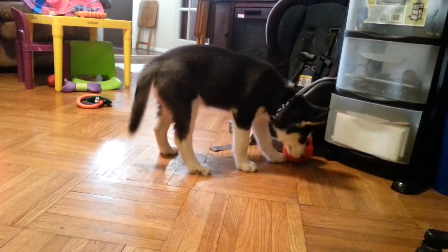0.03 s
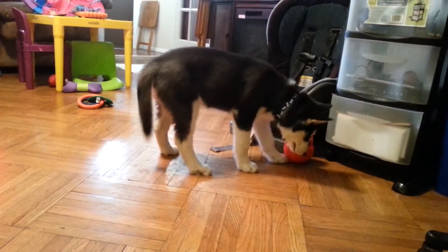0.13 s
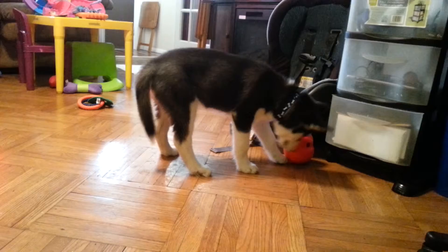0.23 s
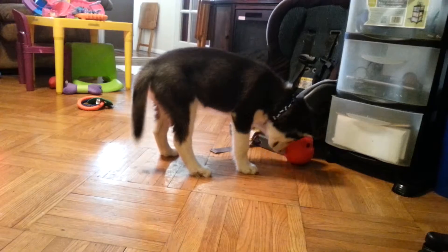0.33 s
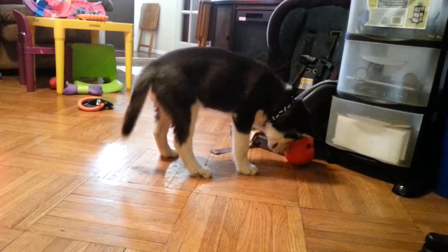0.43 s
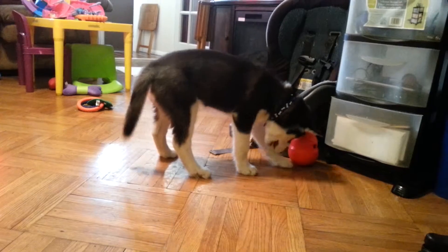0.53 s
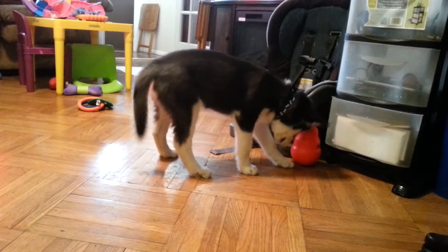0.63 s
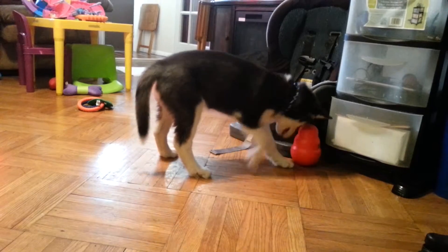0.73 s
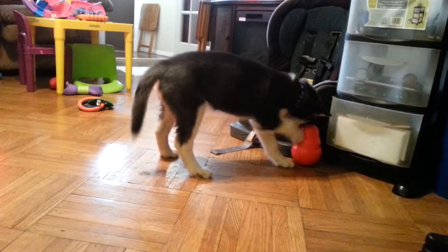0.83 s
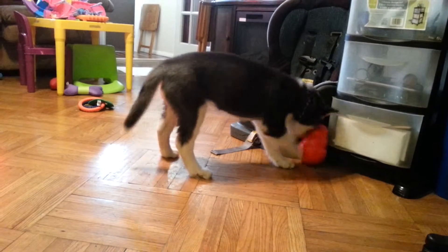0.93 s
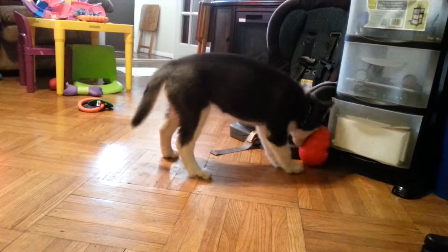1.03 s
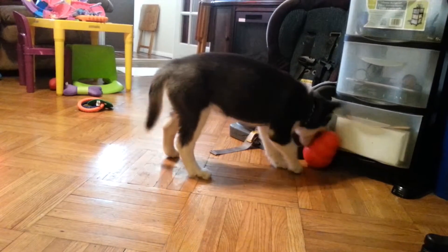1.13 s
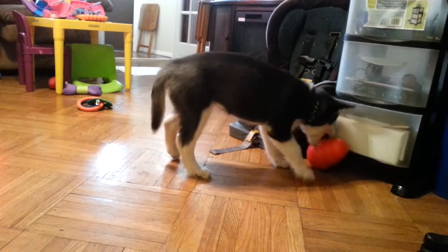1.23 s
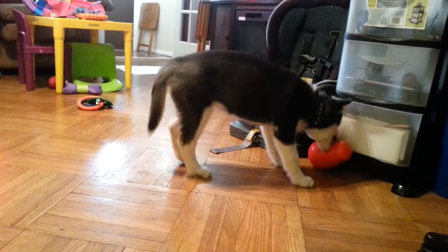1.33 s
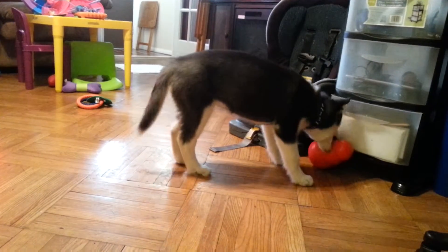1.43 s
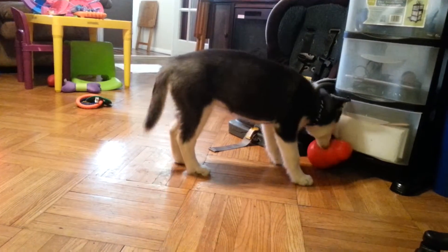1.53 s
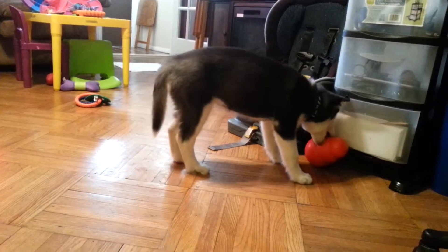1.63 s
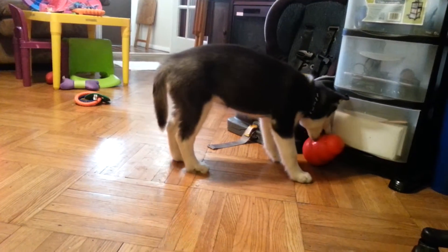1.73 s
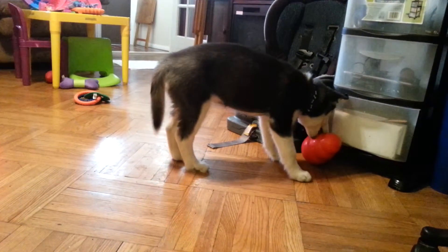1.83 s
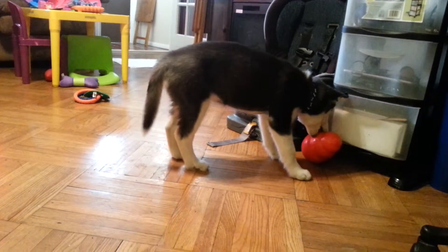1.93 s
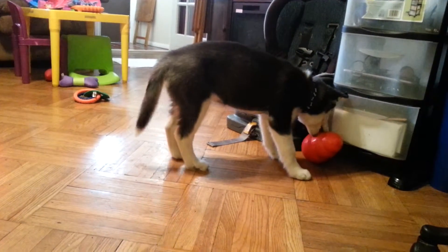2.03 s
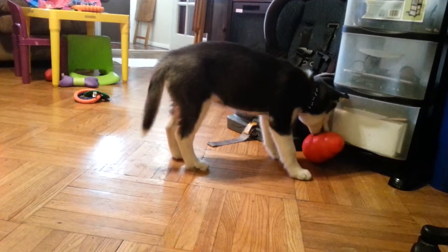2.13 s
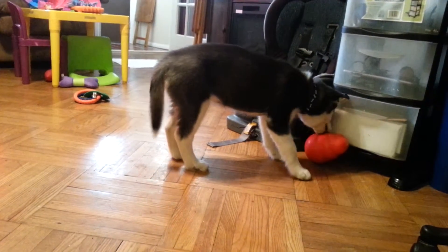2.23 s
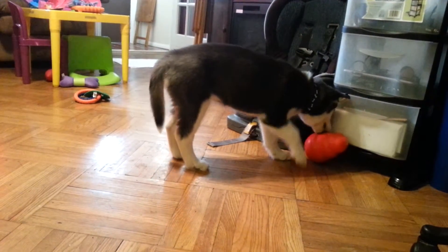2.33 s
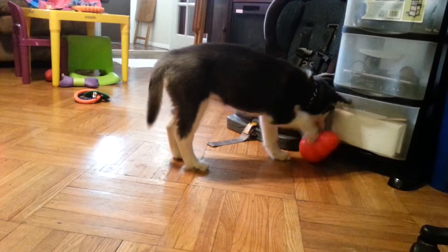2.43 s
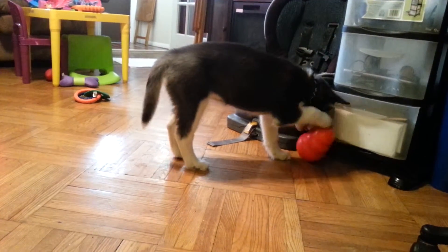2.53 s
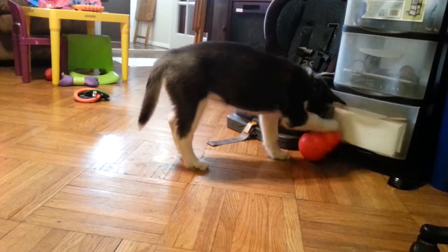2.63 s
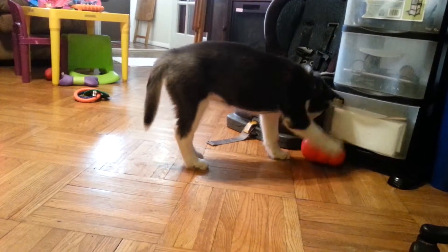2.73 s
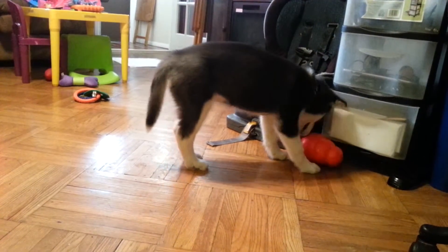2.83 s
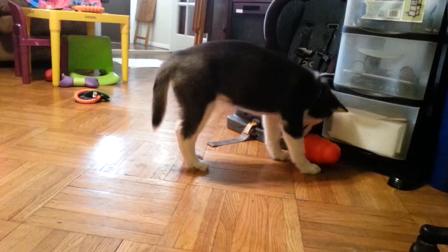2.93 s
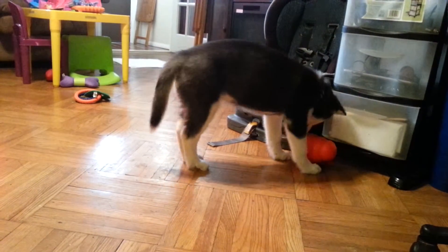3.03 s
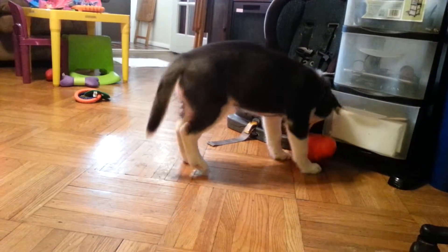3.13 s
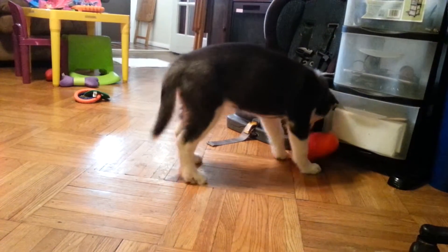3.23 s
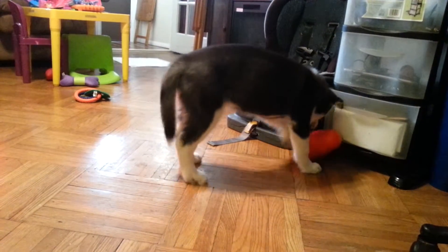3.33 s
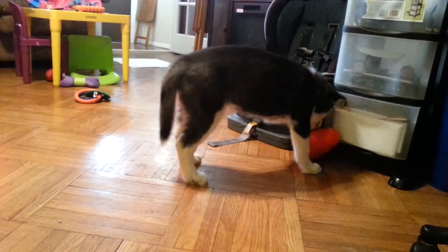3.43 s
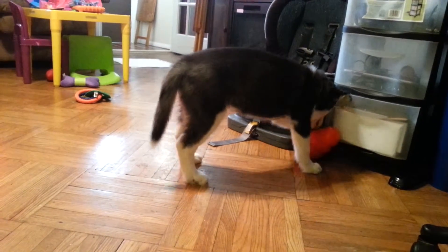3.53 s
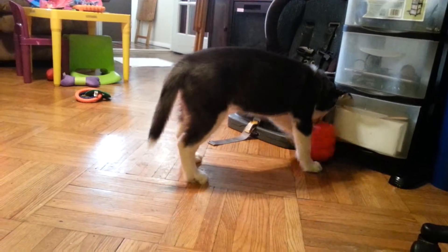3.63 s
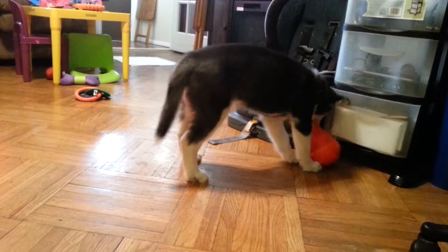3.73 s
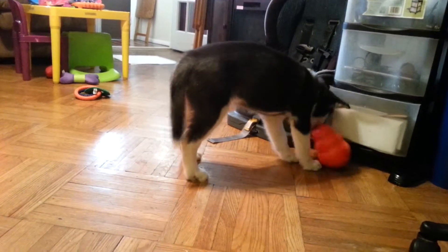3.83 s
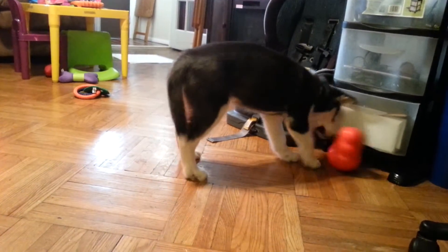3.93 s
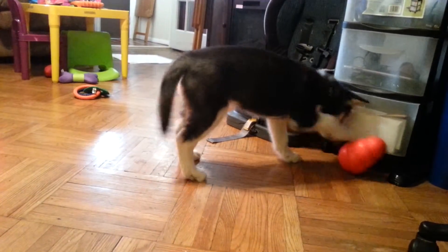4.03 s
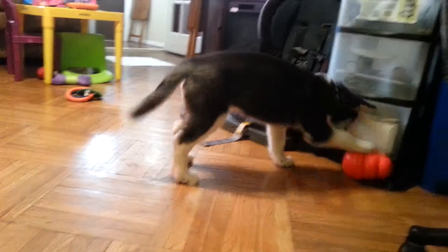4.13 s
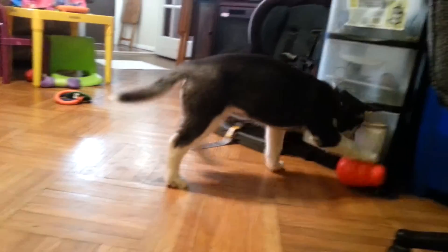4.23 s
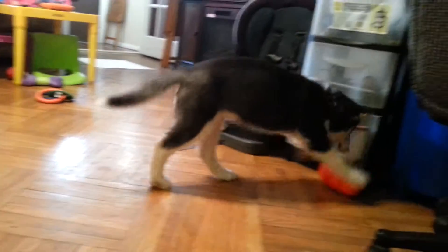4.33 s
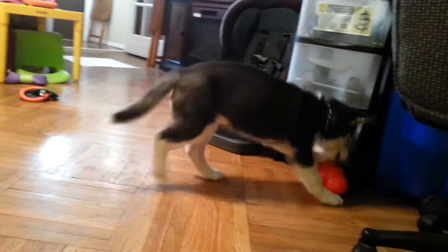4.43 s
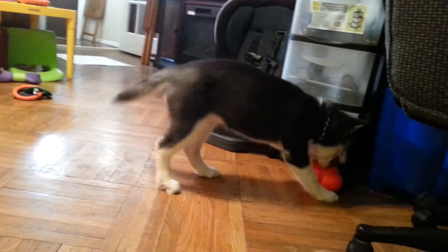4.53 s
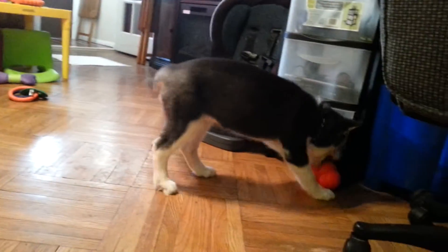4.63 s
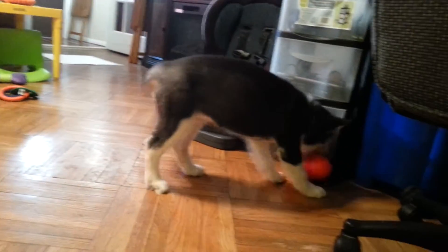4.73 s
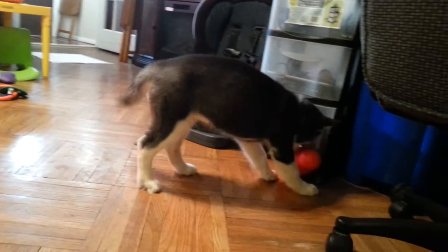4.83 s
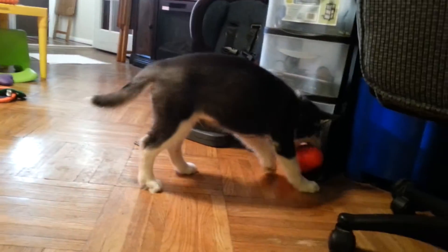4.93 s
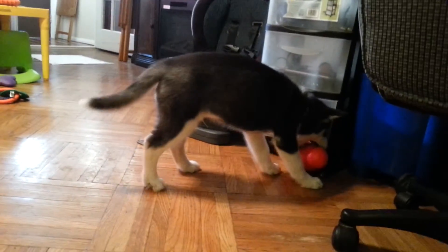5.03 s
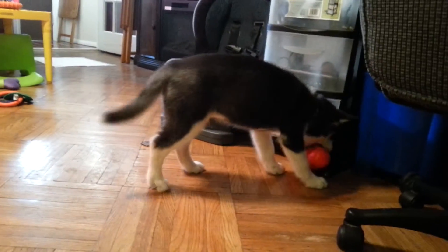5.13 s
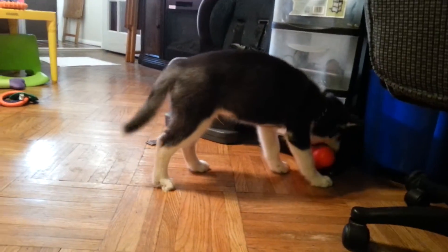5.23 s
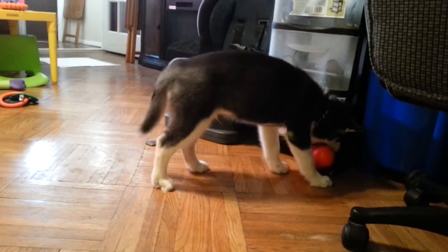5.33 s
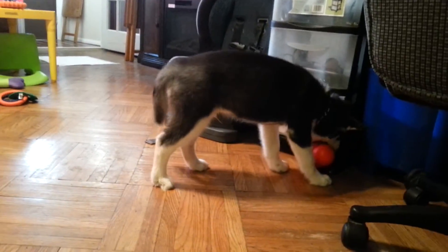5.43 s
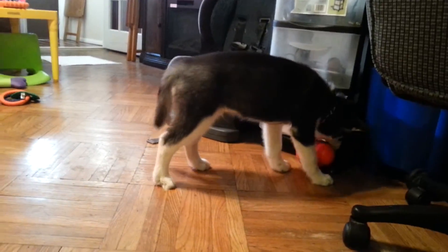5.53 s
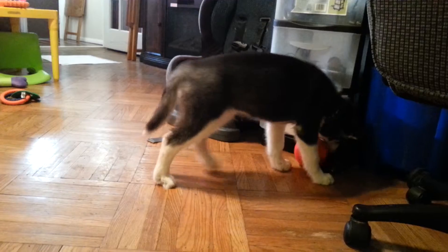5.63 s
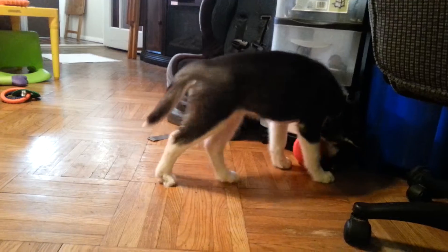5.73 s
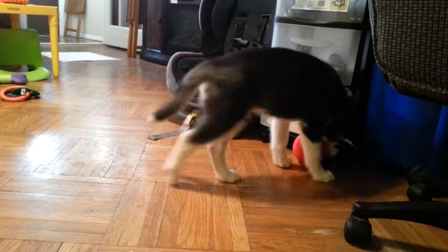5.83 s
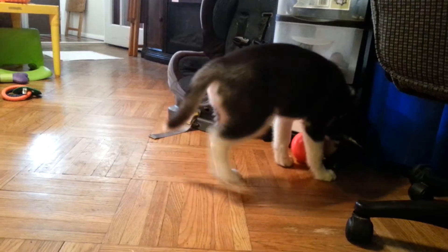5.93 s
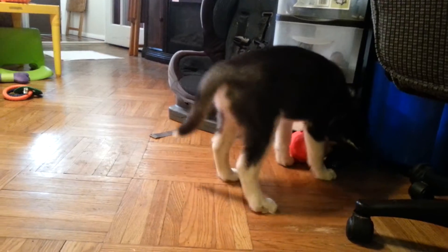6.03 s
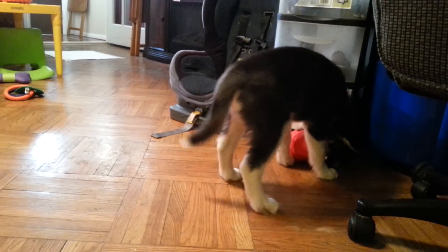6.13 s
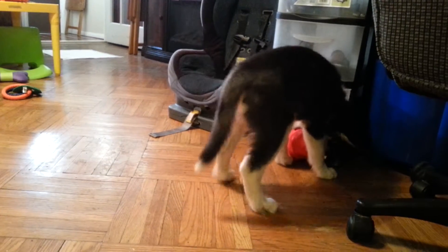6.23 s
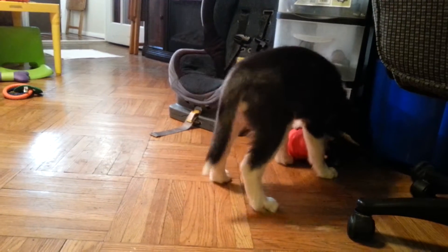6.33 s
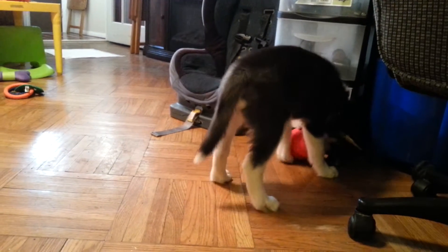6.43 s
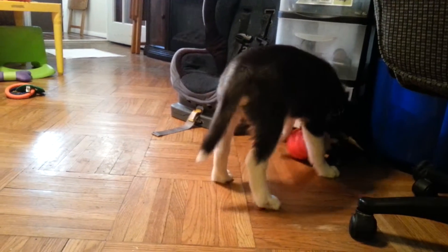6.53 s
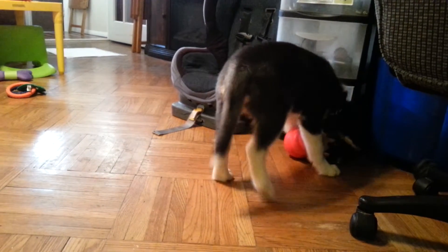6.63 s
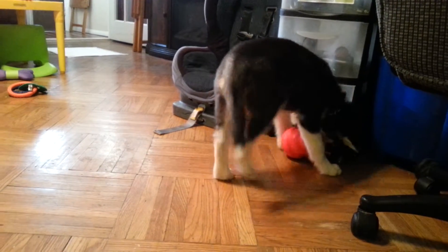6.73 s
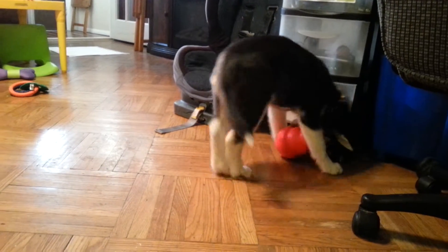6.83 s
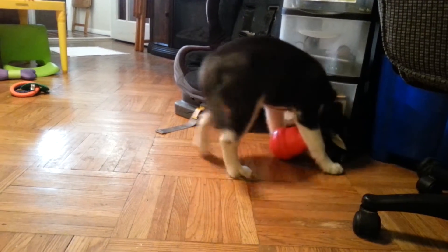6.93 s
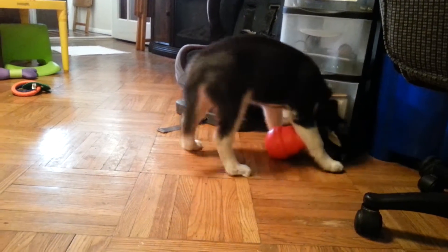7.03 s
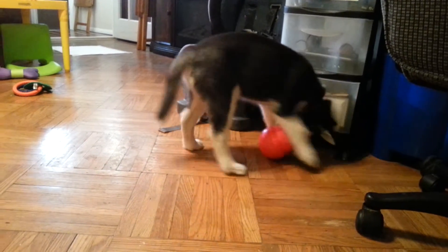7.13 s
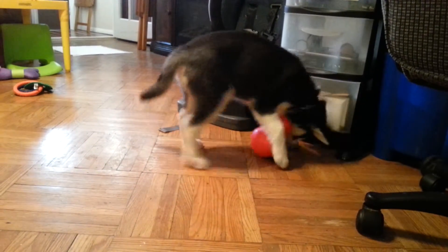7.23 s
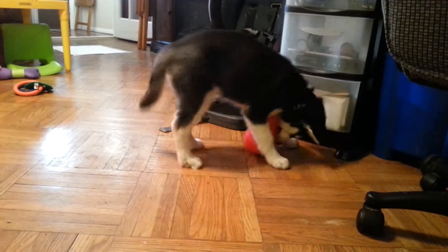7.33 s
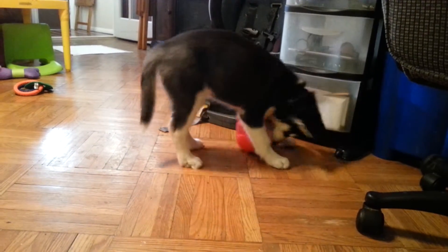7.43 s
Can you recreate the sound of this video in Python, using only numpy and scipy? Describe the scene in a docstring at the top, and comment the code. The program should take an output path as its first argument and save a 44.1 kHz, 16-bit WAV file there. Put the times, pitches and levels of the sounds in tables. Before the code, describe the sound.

A small camera microphone hisses and ticks faintly about thirty times a second in a moderately echoing room. A puppy snuffles at 0.2-0.6 s, then barks in brief high bursts at 0.6, 0.9, and more weakly at 1.25 and 1.45; the 0.9 bark is loudest, harsh and overloaded, with a hard knock. A quieter gap holds small taps and sniffing around 2.2-2.7. At 2.8-2.9 a toy cracks against plastic drawers, booming and rattling. Yips come at 3.45 and 3.75, a strong rough bark at 4.0. From 4.1 to 4.6 hard knocks, hollow thumps, rolling rumble and treat rattle crowd together, then a choppy yip at 4.65-4.75. A dry click at 4.87 cuts the echoes. Soft taps and thuds follow, a thin rising squeak at 5.6, low wavering whines at 5.85-6.25, 6.35-6.6 and 6.7-7.0, and light knocks and rolling at 6.75 and 7.3.

```python
"""In a room with a wooden floor a puppy barks, yips and whines while it shoves a hard treat toy about.
Voices are harmonics under mouth and throat resonances; the nose snuffles in bands of breath noise.
The toy's shell cracks as noise bursts, a plastic drawer unit booms in ringing modes, treats rattle inside.
A small camera microphone overloads on the loud barks; it hisses and ticks faintly thirty times a second.
A treble noise band varies in level, and one dry click sounds where the echoes are cut."""
import sys
import numpy as np
from scipy import signal
from scipy.fft import rfft, irfft
from scipy.io import wavfile

SR = 44100
rng = np.random.default_rng(int(sys.argv[2]) if len(sys.argv) > 2 else 0)


def dump_mix(stems):
    """Bounce the given channels to the path in sys.argv[1] as a 16-bit WAV at rate SR."""
    frames = np.atleast_2d(stems).T  # one column per channel
    limited = np.clip(frames, -1, 1)  # hard clip at full scale
    pcm = np.round(limited * 32767).astype(np.int16)
    wavfile.write(sys.argv[1], SR, pcm)


N = 329427
TIME = np.arange(N) / SR


def from_db(db):
    """Logarithmic level: 20 dB is a factor of ten in amplitude."""
    return 10 ** (np.asarray(db) / 20)


def rms_one(x):
    """Normalisation of mean power: scales to rms 1."""
    return x / np.sqrt(np.mean(np.abs(x) ** 2) + 1e-20)


def lowpass(x, order, hz):
    """Butterworth low-pass filtering: maximally flat below the cutoff."""
    return signal.sosfilt(signal.butter(order, hz, fs=SR, output="sos"), x)


def highpass(x, order, hz):
    """Butterworth high-pass filtering: maximally flat above the cutoff."""
    return signal.sosfilt(signal.butter(order, hz, "high", fs=SR, output="sos"), x)


def sample_index(seconds):
    """Sampling: the nearest sample to each time."""
    return np.round(np.asarray(seconds) * SR).astype(int)


def in_spans(tables, column):
    """Envelope interpolation: the larger curve wins where two overlap, -120 stands between them."""
    out = np.full(N, -120.)
    for rows in map(np.array, tables):
        s = rows[:, 0]
        inside = (TIME >= s[0]) & (TIME <= s[-1])
        curve = np.interp(TIME[inside], s, rows[:, column])
        out[inside] = np.maximum(out[inside], curve)
    return out


def swells(events, edge_db):
    """Piecewise-linear dB envelope: each event rises from edge_db below its levels, peaks and falls back."""
    curves = []
    for s, up, down, *peak in events:
        corners = [(0, edge_db), (up, 0), (up + down, edge_db)]
        curves.append([(s + t, *np.add(peak, db)) for t, db in corners])
    return curves


def coloured(spectrum):
    """Spectral shaping: white noise weighted in frequency, rms 1."""
    hz, db = np.transpose(spectrum)
    grid = np.arange(1, N // 2 + 2) * SR / N
    weight = from_db(np.interp(np.log(grid), np.log(hz), db))
    return rms_one(irfft(rfft(rng.standard_normal(N)) * weight, N))


def ring(drive, hz, t60):
    """Damped resonance: a unit click starts a decaying sine of height 1; t60 is the 60 dB decay in seconds."""
    r, w = from_db(-60 / (t60 * SR)), 2 * np.pi * hz / SR
    return signal.lfilter([0, np.sin(w)], [1, -2 * r * np.cos(w), r * r], drive + 1e-18)


def strike(at, db, modes, spread_db):
    """Modal excitation: every blow strikes every mode with a random strength of its own."""
    out, luck = np.zeros(N), rng.normal(0, spread_db, (len(at), len(modes)))
    for k, (hz, mode_db, t60) in enumerate(modes):
        clicks = np.zeros(N)
        clicks[at] = from_db(db + mode_db + luck[:, k])
        out += ring(clicks, hz, t60)
    return out


def bursts(at, db, spectrum, t60):
    """Exponential decay: coloured noise starts at each blow and falls 60 dB within t60."""
    clicks = np.zeros(N)
    clicks[at] = from_db(db)
    decay = signal.lfilter([1], [1, -from_db(-60 / (t60 * SR))], clicks + 1e-18)
    return coloured(spectrum) * decay


HISS_DB = -52
# Microphone hiss. Each row: frequency in Hz, relative spectral density in dB.
HISS_SPECTRUM = [(24, -47.5), (40, -11), (150, -8), (238, -12), (427, -17), (678, -27.5), (968, -21.5),
                 (2390, -27.5), (2590, -27), (6000, -42.5), (7800, -66.5), (13200, -120)]


def hiss():
    """Stationary noise: a steady microphone hiss with a fixed spectrum."""
    return from_db(HISS_DB) * coloured(HISS_SPECTRUM)


# Treble noise band. Each row: frequency in Hz, relative spectral density in dB.
TREBLE_SPECTRUM = [(2940, -17), (5000, -9), (6320, -13.5), (8770, -4), (15100, -15.5), (16200, -8.5),
                   (16400, -35)]
# Level of the treble noise. Each row: time in seconds, level in dB.
TREBLE_LEVEL = [(0, -59), (1.45, -52), (1.85, -56), (2.0, -67.5), (2.7, -59), (3.5, -58.5), (4.6, -62),
                (4.7, -45.5), (4.86, -55.5), (4.9, -63), (5.4, -63), (6.0, -57), (6.15, -57.5),
                (7.47, -54.5)]


def treble_noise():
    """Amplitude modulation: a treble noise band follows a typed level curve."""
    level_db = np.interp(TIME, *np.transpose(TREBLE_LEVEL))
    return from_db(level_db) * coloured(TREBLE_SPECTRUM)


TICK_START_S, TICKS_PER_S = .0287, 30.04
TICK_DB, TICK_HZ, TICK_T60_S = -34, 306, 0.0075


def ticks():
    """Periodic impulse response: a steady train of clicks excites one heavily damped resonance."""
    clicks = np.zeros(N)
    at = sample_index(np.arange(TICK_START_S, N / SR, 1 / TICKS_PER_S))
    clicks[at] = from_db(TICK_DB + rng.normal(0, 1.5, len(at)))
    # the slope of the sine begins at full height and gives a sharp onset
    tick = np.diff(ring(clicks, TICK_HZ, TICK_T60_S), prepend=0) * SR / (2 * np.pi * TICK_HZ)
    return lowpass(tick, 1, 1500)


SNUFFLE_EDGE_DB = -19.5
# Nose on the floor. Each row: start in seconds, swell in seconds, fade in seconds, peak level in dB,
# band centre in Hz.
SNUFFLES = [(0.226, 0.03, 0.18, -48.5, 2720), (0.399, 0.16, 0.0077, -48.5, 2450),
            (2.199, 0.092, 0.064, -54, 3000), (2.569, 0.08, 0.14, -47, 2530),
            (3.12, 0.064, 0.055, -59, 2210), (3.256, 0.025, .06, -56, 2150)]


def snuffle():
    """Band-limited turbulence: the nostril band is crossfaded among fixed noise bands by its centre."""
    held = [[(s, hz), (s + up + down, hz)] for s, up, down, _, hz in SNUFFLES]
    centre = np.log(np.maximum(in_spans(held, column=1), 1))
    breath = np.zeros(N)
    for hz in np.geomspace(1200, 5500, 7):
        band = signal.butter(2, [hz / 1.15, hz * 1.15], "band", fs=SR, output="sos")
        noise = rms_one(signal.sosfilt(band, rng.standard_normal(N)))
        breath += noise * np.exp(-((centre - np.log(hz)) / 0.63) ** 2)
    level_db = in_spans(swells(SNUFFLES, SNUFFLE_EDGE_DB), column=1)
    return from_db(level_db) * breath / np.sqrt(2)  # about two bands sound at once


MOUTH_WIDTH_HZ, MOUTH_STEEPNESS, BELOW_MOUTH_SLOPE = 337, 1.34, 0.5
THROAT_HZ, THROAT_WIDTH_HZ = 2940, 763
ROUGH_HZ, FLUTTER_HZ, FLUTTER_DB, FLUTTER_PITCH = 240, 45, 3.5, .012  # pitch flutter is a fraction
STEADY_DB, SHAKY_DB = -20, -32  # a voice weaker than the first starts to flutter, fully at the second


def call(rows):
    """Source-filter voice: harmonics under mouth and throat resonances, smeared to noise by rough folds."""
    s, *columns = np.transpose(rows)
    span = slice(round(s[0] * SR), round(s[-1] * SR))
    pitch, level_db, odd_db, mouth, throat_db, rough = (np.interp(TIME[span], s, c) for c in columns)
    shaky = np.interp(np.max(level_db), [SHAKY_DB, STEADY_DB], [1, 0])
    slow = lowpass(rng.standard_normal((2, len(pitch) + 2000)), 2, FLUTTER_HZ)
    sway, flutter = shaky * rms_one(slow[:, 2000:])  # the filter's start is left out
    phase = 2 * np.pi * np.cumsum(pitch * (1 + FLUTTER_PITCH * sway)) / SR
    order = np.arange(1, 19)[:, None]
    hz = order * pitch

    # a nearly shut mouth passes a narrower band in a weak voice
    steepness = MOUTH_STEEPNESS + 0.92 * shaky
    shape = (1 + ((hz - mouth) / MOUTH_WIDTH_HZ) ** 2) ** -steepness
    shape = shape + from_db(throat_db) / (1 + ((hz - THROAT_HZ) / THROAT_WIDTH_HZ) ** 6)
    shape = shape * np.minimum(hz / mouth, 1) ** BELOW_MOUTH_SLOPE
    # odd harmonics fade when the voice flips up an octave
    shape = shape * np.where(order % 2, from_db(odd_db), 1)

    # upper harmonics blur first, more so in a weak voice
    blur = 1 - (1 - np.clip(rough, 0, 1)) ** ((order / 2) ** (1 + shaky))
    white = rng.standard_normal((2, len(order), len(pitch) + 500))
    wobble = lowpass(white[0] + 1j * white[1], 2, ROUGH_HZ)[:, 500:]
    folds = np.sqrt(1 - blur) + np.sqrt(blur) * rms_one(wobble)
    harmonics = np.real(folds * np.exp(1j * (order * phase + order ** 2)))
    tone = np.sum(shape * harmonics, axis=0) / np.sqrt(np.sum(shape ** 2, axis=0) / 2)
    return span, from_db(level_db + FLUTTER_DB * flutter) * tone


def voice(calls):
    """Superposition: separate calls add on the time axis."""
    out = np.zeros(N)
    for rows in calls:
        span, sound = call(rows)
        out[span] += sound
    return out


ATTACK_S, RELEASE_S, EDGE_DB = .006, .01, -29.5  # every note fades in and out this far
GLIDE_BEND = .7  # below 1 a glide starts fast and levels off
MOUTH_PER_PITCH, MOUTH_OPEN_HZ = 2.6, 1170  # the mouth resonance follows the pitch until wide open
LEAP_HZ, LEAP_DB_PER_HZ = 583, 0.27  # above this pitch the odd harmonics grow


def bark_note(s, length, from_hz, to_hz, db, swell_db, odd_db, throat_db, rough):
    """Vocal glide: attack, bent pitch path and release; mouth and odd harmonics follow the pitch."""
    along = np.r_[0, np.linspace(0, 1, 6), 1]
    t = s + length * along + np.r_[-ATTACK_S, np.zeros(6), RELEASE_S]
    pitch = from_hz + (to_hz - from_hz) * along ** GLIDE_BEND
    level_db = db + swell_db * along + EDGE_DB * np.r_[1, np.zeros(6), 1]
    odd_db = odd_db + LEAP_DB_PER_HZ * np.maximum(pitch - LEAP_HZ, 0)
    throat_db = throat_db + 1.35 * min(swell_db, 0) * along  # a fading note also grows duller
    mouth = np.minimum(MOUTH_PER_PITCH * pitch, MOUTH_OPEN_HZ)
    return np.transpose(np.broadcast_arrays(t, pitch, level_db, odd_db, mouth, throat_db, rough))


# Notes of the barks, two to four to a bark, joined by voice breaks. Each row: start in seconds,
# length in seconds, first pitch in Hz, last pitch in Hz, starting level in dB, swell along the note in dB,
# odd harmonics below the leap in dB, throat resonance at the start in dB, roughness from 0 to 1.
BARK_NOTES = [ (0.569, 0.031, 530.3, 637, -6.5, 0, -6, -18, 0.08),
              (0.603, 0.025, 538.4, 551.4, -4.5, -4.5, -21.5, -7, 0.08),
              (0.898, .024, 526, 677, -7, 2.5, -3.5, -17.5, .07),
              (0.931, 0.011, 597, 581.4, 2.5, -1, -9.5, -3, 0.87),
              (0.944, 0.051, 575.6, 547.6, 0, -8, -32.5, -13.5, 0.05),
              (1.240, 0.026, 559.3, 652, -10.5, -6.5, 1, -7.5, 0.07),
              (1.273, 0.0095, 482.5, 535, -12.5, 5, -9, -14.5, 0.06),
              (1.284, 0.043, 518, 421.4, -12.5, -11.5, -38, -12, 0.03),
              (1.443, 0.019, 528, 550, -21, 13.5, -34.5, -54, 0.01),
              (1.471, .032, 479, 384.3, -17, -9, -12.5, -17, 0.12),
              (3.437, .005, 546, 531, -14.5, 0, -17, -17.5, 0.11),
              (3.446, 0.016, 521, 482.6, -21, 4.5, -12, -10.5, 0.5),
              (3.465, 0.038, 416.6, 382, -16.5, -10, -15.5, -23.5, 0.1),
              (3.72, .026, 511, 645, -14.5, 3, -7, -11, 0.29),
              (3.755, 0.012, 416, 447, -11, -2.5, -13.5, -4, 0.13),
              (3.77, .031, 444, 393, -15, -12.5, -17.5, -14.5, 0.1),
              (3.977, 0.032, 521, 655.4, -4.5, 0.5, -4, -10, 0.08),
              (4.013, .040, 596.6, 602.4, -1.5, -6, -4, -2, 0.86),
              (4.638, .016, 556, 608, -30, 11.5, -4, -16, 0.38),
              (4.662, .033, 443, 565.5, -17.5, 7, 0, -6.5, 0.14),
              (4.701, 0.019, 570, 614.4, -12.5, 1.5, -2.5, -22.5, 0.08),
              (4.732, 0.018, 583, 569, -27, 1.5, 12, -23, 0.22)]


def barks():
    """Register breaks: short gliding notes follow each other closely to form barks."""
    return voice([bark_note(*note) for note in BARK_NOTES])


PAD_HZ = 500
# Modes of the plastic drawer unit. Each row: frequency in Hz, relative level in dB, 60 dB decay in seconds.
DRAWER_MODES = [(101, -15.5, .06), (149.5, -19, .05), (232.5, -7, 0.06), (256, -4.5, 0.08),
                (302.7, -9.5, 0.13), (323, -4.5, 0.056), (461.6, -14, 0.12), (590, -8.5, 0.017)]


def drawer_boom(at, db):
    """Soft impact: drawer modes ring, low-passed because the toy's heavy base and the paws land softly."""
    return lowpass(strike(at, db, DRAWER_MODES, spread_db=3), 2, PAD_HZ)


def drawer_rumble():
    """Resonant noise filtering: random rolling force drives the drawer modes at a tenth of their decay."""
    rumble = np.zeros(N)
    for hz, db, t60 in DRAWER_MODES:
        rumble += from_db(db) * ring(rng.standard_normal(N), hz, t60 * 0.1)
    return rms_one(rumble)


# Duller part of the hard shell's sound. Each row: frequency in Hz, relative spectral density in dB.
SHELL_BODY = [(300, -35), (600, 0.5), (1200, -6), (2400, -4.5), (4000, -23), (16000, -55)]


def shell_body(at, db, t60):
    """High modal density: many short shell modes blur into a duller burst of noise."""
    return bursts(at, db, SHELL_BODY, t60)


# Brighter part of the hard shell's sound. Each row: frequency in Hz, relative spectral density in dB.
SHELL_CRACK = [(1200, -32.5), (2500, 2), (4400, 0.5), (7000, -6), (11000, -15), (16000, -39.5)]


def shell_crack(at, db, t60):
    """High modal density: many short shell modes blur into a brighter burst of noise."""
    return bursts(at, db, SHELL_CRACK, t60)


BODY_DB, BODY_FOLLOWS_CRACK = -8, 0.69  # the dull part follows a mixture of crack and boom levels
BODY_T60_S, CRACK_T60_S = 0.047, 0.022
# Toy on floor and drawers. Each row: time in seconds, crack level in dB before its peak allowance,
# boom level in dB before the level of each mode.
KNOCKS = [(0.8836, -9, -35.5), (2.2146, -43.5, -56), (2.4854, -24, -46), (2.523, -28, -60),
          (2.7578, -40, -29.5), (2.782, -38, -29), (2.7913, -25, -17), (2.8, -10.5, -32),
          (2.8119, -39, -11), (2.8431, -14, -28), (2.8669, -38, -18), (2.8832, -19, -24.5),
          (2.9331, -30, -33), (3.5926, -29.5, -31), (3.6634, -32.5, -30), (3.8366, -19, -6.5),
          (3.8844, -26, -30), (4.1278, -17, -46), (4.147, -15.5, -23.5), (4.195, -3, -13.5),
          (4.2162, -17, -11.5), (4.2514, -19, -20), (4.2848, -28.5, -22), (4.3262, -23, -42),
          (4.3409, -17, -9.5), (4.355, -20, -10), (4.4049, -8.5, -46), (4.4621, -8, -12),
          (4.4715, -13, -22), (4.4897, -15.5, -22), (4.5451, -22.5, -30), (4.5895, -22, -64),
          (4.761, -21.5, -50), (4.9624, -36, -53), (4.9803, -46, -38), (5.013, -39, -61), (5.035, -48, -58),
          (5.0503, -27, -39), (5.158, -40.5, -62), (6.7455, -24, -41), (7.3041, -24.5, -58.5)]


def knocks():
    """Impact radiation: each blow cracks in the shell and booms in the drawers."""
    s, crack_db, boom_db = np.transpose(KNOCKS)
    at = sample_index(s)
    body_db = BODY_DB + BODY_FOLLOWS_CRACK * crack_db + (1 - BODY_FOLLOWS_CRACK) * boom_db
    crack = shell_crack(at, crack_db, CRACK_T60_S) / 1.69  # noise peaks above its rms
    return drawer_boom(at, boom_db) + shell_body(at, body_db, BODY_T60_S) + crack


# Paws thud by the drawers. Each row: time in seconds, strength in dB before a 3 dB cut and the mode levels.
STEPS = [(0.999, -18), (3.456, -19.5), (4.622, -45), (4.739, -12), (5.056, -23), (5.318, -44),
         (5.608, -32.5), (5.715, -35), (5.784, -39.5), (7.345, -42), (7.413, -20.5)]


def paw_steps():
    """Structure-borne sound: paw thuds set the drawer modes ringing."""
    s, db = np.transpose(STEPS)
    return drawer_boom(sample_index(s), db) / np.sqrt(2)


# Thin nasal whistles in or after some calls. Each row: start in seconds, length in seconds,
# first frequency in Hz, last frequency in Hz, peak level in dB.
WHISTLES = [(1.305, .045, 7500, 6700, -42), (3.46, .06, 6800, 6750, -48), (3.77, .04, 7300, 6900, -31),
            (5.62, .04, 6800, 6500, -43), (5.838, .08, 3480, 3400, -43)]


def nasal_whistles():
    """Frequency modulation: a pure tone glides under a smooth bell-shaped envelope."""
    out = np.zeros(N)
    for s, length, from_hz, to_hz, db in WHISTLES:
        size = round(length * SR)
        cycles = np.cumsum(np.linspace(from_hz, to_hz, size)) / SR
        out[round(s * SR):][:size] += from_db(db) * np.hanning(size) * np.sin(2 * np.pi * cycles)
    return out


RATTLES_PER_S, RATTLE_T60_S = 600, 0.0044


def treat_rattle():
    """Random impact process: many tiny blows of uneven strength merge into a rattle."""
    at = rng.choice(N, round(RATTLES_PER_S * N / SR), replace=False)
    sizes_db = 4.5 * np.minimum(rng.exponential(1, len(at)), 3)
    bright = shell_crack(at, sizes_db, RATTLE_T60_S)
    return rms_one(bright + from_db(5.5) * shell_body(at, sizes_db, RATTLE_T60_S))


ROLL_EDGE_DB = -21.5
# The toy rolls. Each row: start in seconds, swell in seconds, fade in seconds, rumble peak level in dB,
# peak level of the rattling treats in dB.
ROLLS = [(2.7, 0.14, 0.2, -32, -39.5), (3.5, 0.25, 0.3, -34.5, -38), (3.78, 0.085, 0.12, -25.5, -50),
         (4.08, 0.18, 0.56, -26, -35), (4.32, 0.18, 0.13, -23, -49), (4.88, 0.21, 0.11, -44, -55),
         (6.4, 0.41, .4, -54, -50), (7.2, 0.37, .1, -35.5, -42.5)]


def rolling():
    """Amplitude modulation: rumble and rattle swell and fade together with each roll."""
    roll = swells(ROLLS, ROLL_EDGE_DB)
    rumble = from_db(in_spans(roll, column=1)) * drawer_rumble()
    return rumble + from_db(in_spans(roll, column=2)) * treat_rattle()


CUT_S, CLICK_DB = 4.8708, -15.5
# Modes of the click at the cut. Each row: frequency in Hz, relative level in dB, 60 dB decay in seconds.
CLICK_MODES = [(1285, -11, 0.0069), (2880, 19.5, 0.0016), (7560, 11, 0.0025), (12000, -27, 0.00093)]


def cut_click():
    """Impulse: one dry click where the echoes are cut."""
    return strike([round(CUT_S * SR)], CLICK_DB, CLICK_MODES, spread_db=1)


ROUGH_OPENS_HZ = 260  # a rough whine opens the mouth wider


def whine(rows, mouth_hz, throat_db):
    """Formant tuning: a nearly shut mouth is tuned to the pitch where that lies higher."""
    tuned = []
    for s, hz, db, odd_db, rough in rows:
        mouth = max(hz, mouth_hz + ROUGH_OPENS_HZ * rough)
        tuned.append((s, hz, db, odd_db, mouth, throat_db, rough))
    return tuned


# One table per whine. Each row: time in seconds, pitch in Hz, level in dB, odd harmonics in dB,
# roughness (its effect on the harmonics is full at 1).
WHINES = [
    [(5.395, 753, -67.5, 5, .3), (5.415, 805, -38.5, -2, 0.43), (5.46, 860, -51, 8.5, .7),
     (5.53, 1231, -49, 2, 0.17), (5.558, 1300, -82, 5, .2), (5.577, 1372, -31, -6, 0),
     (5.598, 1434, -24, 5, 0), (5.626, 1475, -30.5, 8, .07), (5.645, 1450, -49, -26, 0.2)],
    [(5.836, 406, -56, -1, 1.1), (5.848, 397.8, -27, 5, 0.25), (5.9, 401.3, -27.5, 21, 0.8),
     (5.935, 392, -30, -3, 0), (6.0, 404.8, -36.5, 0, 0.23), (6.07, 435.6, -32, -21, 0.2),
     (6.135, 471.4, -36, -1, 0.02), (6.225, 484, -48, -27, 0.04), (6.245, 484, -64, -36, 0.1)],
    [(6.335, 482, -48, -13, 0.9), (6.352, 465.4, -40.5, -6, 0.87), (6.42, 447, -38.5, -18, 0.12),
     (6.49, 490, -38, -10, 0.15), (6.535, 433, -36, -28, 0.01), (6.585, 389, -51, -27, .1)],
    [(6.695, 426.6, -52.5, -2, 0.48), (6.75, 520, -37, 12, 0.42), (6.81, 500.3, -36, 9, 0.24),
     (6.835, 405, -41, 31, .05), (6.9, 421.3, -28.5, 26, 0.06), (6.945, 412, -59, 11, 0.42),
     (6.985, 419.2, -59, 12, 0.5)],
]
# One row per whine. Each row: lowest mouth resonance in Hz when smooth, throat resonance in dB.
WHINE_VOICES = [(843, -22.5), (886, -24.5), (900, -23), (765, -24)]


def whines():
    """Continuous phonation: pitch, level and roughness wander along each whine."""
    return voice([whine(rows, *resonances) for rows, resonances in zip(WHINES, WHINE_VOICES)])


ROOM_DB, FIRST_ECHO_S = -8.5, 0.0037
# Reverberation of the room. Each row: band frequency in Hz, 60 dB decay in seconds.
ROOM_DECAY = [(250, 0.23), (600, 0.38), (1300, 0.37), (3000, 0.41), (7000, 0.19), (13000, .15)]


def room(x):
    """Diffuse reverberation: echoes as noise that dies away, each band at its own speed."""
    t = TIME[:SR // 2 + SR // 4]
    echoes = np.zeros(len(t))
    for hz, t60 in ROOM_DECAY:
        band = signal.butter(2, [hz / 1.91, hz * 1.69], "band", fs=SR, output="sos")
        noise = signal.sosfilt(band, rng.standard_normal(len(t)))
        echoes += noise * from_db(-60 * t / t60) / np.sqrt(t60 * SR / 14)  # long decays gain no energy
    return from_db(ROOM_DB) * signal.fftconvolve(x, [echoes * (t > FIRST_ECHO_S)], axes=1)[:, :N]


def scene():
    """Superposition: puppy and toy echo in the room, hiss, treble noise, ticks and click stay dry."""
    near = snuffle() + barks() + knocks() + paw_steps() + nasal_whistles() + rolling() + whines()
    later = TIME >= CUT_S
    # the echoes of all earlier sound break off at the cut
    echoes = room(np.stack([near * ~later, near * later]))
    unechoed = hiss() + treble_noise() + ticks() + cut_click()
    return (near + echoes[0] * ~later + echoes[1] + unechoed)[None]


MIC_CUT_HZ, BASS_CUT_HZ, CUTOFF_HZ = 140, 10, 16650
TOP_UP, TOP_DOWN, HARDNESS = .71, .675, 5  # amplitude ceilings upward and downward, sharpness of the bend


def record(dry):
    """Nonlinear saturation: thin microphone bass, hard lopsided overload, then bass and treble cuts."""
    thin = highpass(dry, 2, MIC_CUT_HZ)
    top = np.where(thin > 0, TOP_UP, TOP_DOWN)
    clipped = thin / (1 + (np.abs(thin) / top) ** HARDNESS) ** (1 / HARDNESS)
    clipped = highpass(clipped, 1, BASS_CUT_HZ)
    return signal.sosfilt(signal.cheby2(18, 60, CUTOFF_HZ, fs=SR, output="sos"), clipped)


dry = scene()
out = record(dry)
dump_mix(out)
```